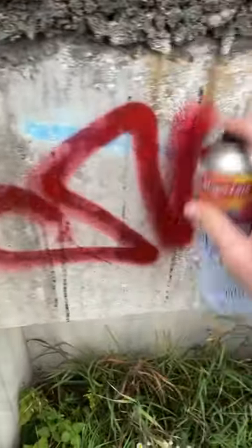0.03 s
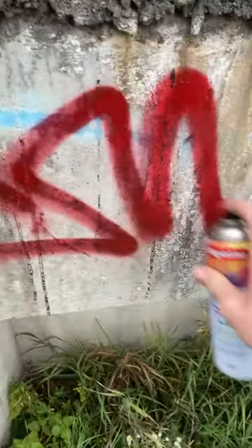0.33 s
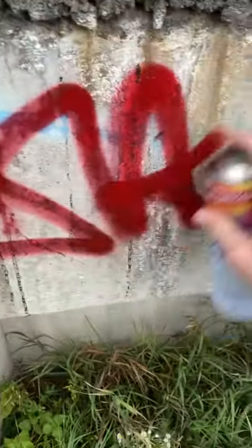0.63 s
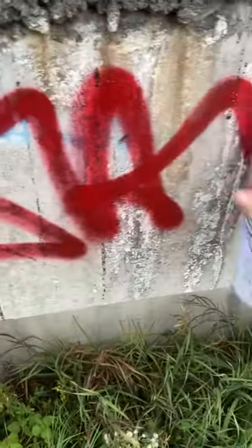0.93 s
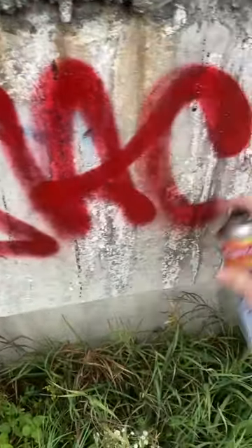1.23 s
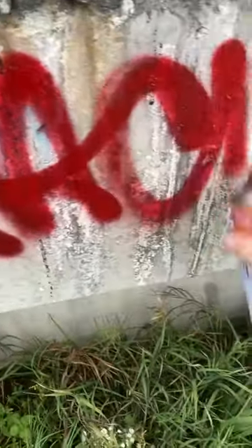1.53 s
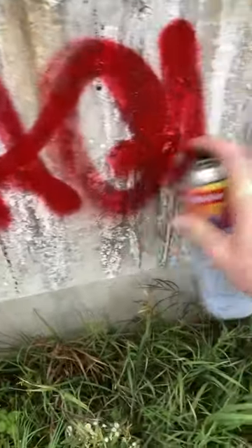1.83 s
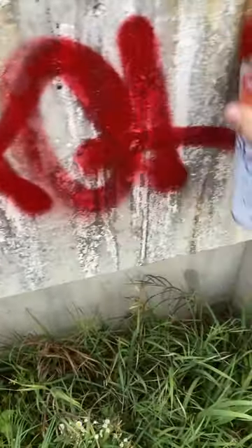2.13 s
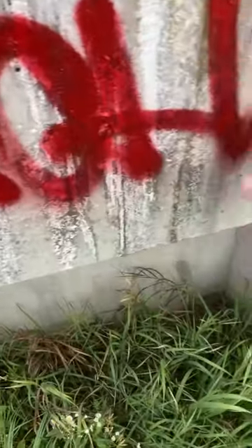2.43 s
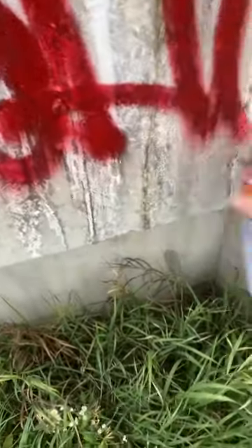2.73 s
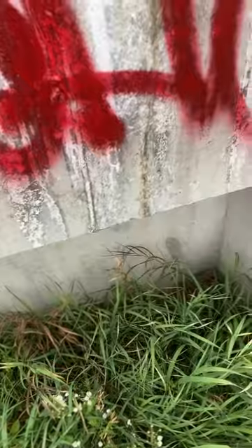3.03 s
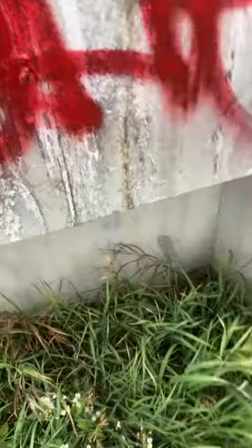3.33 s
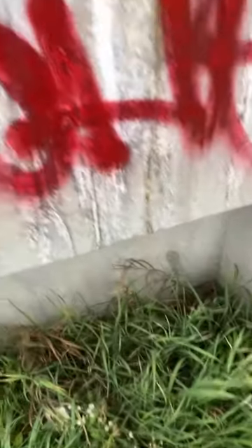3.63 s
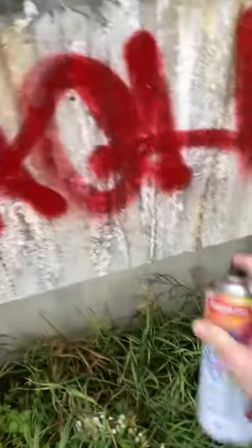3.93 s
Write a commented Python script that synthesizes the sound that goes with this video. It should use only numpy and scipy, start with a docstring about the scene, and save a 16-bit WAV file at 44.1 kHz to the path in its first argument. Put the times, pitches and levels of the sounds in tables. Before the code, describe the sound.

A spray paint can hisses close by outdoors, thin and high, from the start, turning fuller from about 1.3 to 2.2 seconds. The mixing ball clicks and rattles irregularly inside, clacking hardest between 1.4 and 1.8 seconds. Low puffs of wind touch the microphone near 2.1 and 2.9 seconds. The hiss cuts off at 3.4 seconds, and the ball rattles on softly over a faint background.

```python
"""A can of spray paint hisses at a concrete wall outdoors, an arm's length from two small microphones.
The hiss is heard mostly above 8 kHz; its lower band comes through in a few stretches.
The mixing ball strikes the can as the hand swings, and rattles on softly after the valve shuts.
Puffs of air buffet the microphones over a faint outdoor background."""
import sys
import numpy as np
from scipy import signal
from scipy.fft import rfft, irfft
from scipy.io import wavfile
from scipy.ndimage import uniform_filter1d

SR = 44100
rng = np.random.default_rng(int(sys.argv[2]) if len(sys.argv) > 2 else 0)


def dump_mix(stems):
    """Bounce the given channels to the path in sys.argv[1] as a 16-bit WAV at rate SR."""
    frames = np.atleast_2d(stems).T  # one column per channel
    limited = np.clip(frames, -1, 1)  # hard clip at full scale
    pcm = np.round(limited * 32767).astype(np.int16)
    wavfile.write(sys.argv[1], SR, pcm)


N = 176400


def gain_of(db):
    """Decibels to amplitude."""
    return 10 ** (np.asarray(db) / 20)


def unit_rms(x):
    """Scales to rms 1."""
    return x / np.sqrt(np.mean(x ** 2) + 1e-20)


def at_hz(table, hz):
    """Interpolates a spectrum table over log frequency."""
    table_hz, values = np.transpose(table)
    return np.interp(np.log(hz + 1), np.log(table_hz + 1), values)


def add_at(mix, start_s, sound):
    """Mixes in a two-channel sound."""
    part = mix[:, max(round(start_s * SR), 0):][:, :sound.shape[1]]
    part += sound[:, :part.shape[1]]


def coloured(x, colour):
    """Minimum-phase filter from a table of Hz and dB."""
    size = x.shape[-1]
    log_gain = np.log(gain_of(at_hz(colour, abs(np.fft.fftfreq(size, 1 / SR)))))
    response = np.exp(signal.hilbert(log_gain).conj()[:size // 2 + 1])
    return irfft(rfft(x) * response, size)


def noise(colour, size=N):
    """Two-channel coloured noise at rms 1."""
    return unit_rms(coloured(rng.standard_normal((2, size)), colour))


def stft_grid(size=256):
    """Frame times in seconds (column) and bin frequencies in Hz (row)."""
    frame_s = np.arange(N * 4 // size + 5) * (size // 4) / SR
    return frame_s[:, None], np.fft.rfftfreq(size, 1 / SR)


def turbulence(field_db, patch_db, flicker_db, size=256):
    """Two-channel noise under a time-frequency level, with drifting patches and quick flicker."""
    patches = uniform_filter1d(rng.standard_normal(field_db.shape), size=18, axis=0)
    patches = unit_rms(uniform_filter1d(patches, size=8, axis=1))
    flicker = unit_rms(uniform_filter1d(rng.standard_normal((len(field_db), 1)), size=5, axis=0))
    real, imag = rng.standard_normal((2, 2) + field_db.shape)
    bins = (real + 1j * imag) * gain_of(field_db + patch_db * patches + flicker_db * flicker)
    return signal.istft(bins.transpose(0, 2, 1), nperseg=size, noverlap=size - size // 4)[1][:, :N]


def valve(shut_s=3.408, fall_db_per_s=607):
    """Nozzle flow: steady until the valve shuts."""
    return gain_of(-fall_db_per_s * np.maximum(np.arange(N) / SR - shut_s, 0))


# Each row: time in seconds, level at lower_hz in dB, level at upper_hz in dB.
JET_LEVELS = [(0.0, -39.5, -31.5), (0.51, -33.5, -36.5), (0.68, -38, -31.5), (0.82, -33, -39.5),
              (0.99, -38.5, -33), (1.08, -36.5, -35.5), (1.97, -34.5, -37.5), (2.75, -35.5, -36),
              (2.87, -45.5, -39.5), (3.07, -37, -35.5), (3.21, -40, -30.5), (3.4, -40, -42)]
# Each row: frequency in Hz, relative density in dB.
JET_COLOUR = [(7820, -56.5), (8020, 3.5), (9500, 0), (11000, 3), (13500, 0.5), (15700, -2)]


def paint_jet(lower_hz=8900, upper_hz=12000):
    """The nozzle's turbulent hiss as heard above 8 kHz; its colour tilts as the can turns."""
    t, hz = stft_grid()
    times_s, lower_db, upper_db = np.transpose(JET_LEVELS)
    lower_db, upper_db = np.interp(t, times_s, lower_db), np.interp(t, times_s, upper_db)
    level = np.hypot(gain_of(lower_db), gain_of(upper_db))
    upper_share = np.clip((hz - lower_hz) / (upper_hz - lower_hz), 0, 1)
    tilt_db = lower_db * (1 - upper_share) + upper_db * upper_share - 20 * np.log10(level)
    hiss = unit_rms(coloured(turbulence(tilt_db, patch_db=3.0, flicker_db=-0.76), JET_COLOUR))
    return hiss * np.interp(np.arange(N) / SR, t[:, 0], level[:, 0]) * valve()


# Each row: start in seconds, end in seconds, level in dB.
LOW_BAND_STRETCHES = [(1.332, 1.542, -37.5), (1.616, 2.15, -38.5), (2.834, 2.882, -36.5)]
# Each row: frequency in Hz, relative density in dB.
LOW_BAND_COLOUR = [(200, 8), (700, -1.5), (1900, 2.5), (2700, -7), (4100, -14.5), (6000, -18), (7800, -3.5),
                   (8400, -52)]


def hiss_low_band(faint_db=-61, treble_boost_db=16.5, shelf_hz=3300, edge_s=0.006):
    """The hiss below 8 kHz: mostly faint, it comes through louder and brighter in a few stretches."""
    t, hz = stft_grid(size=512)
    level, openness = gain_of(faint_db), 0
    for start_s, end_s, db in LOW_BAND_STRETCHES:
        gate = (np.tanh((t - start_s) / edge_s) - np.tanh((t - end_s) / edge_s)) / 2
        level = level + gate * gain_of(db)
        openness = openness + gate
    shelf = np.clip(np.log2((hz + 1) / shelf_hz), 0, 1)
    field_db = at_hz(LOW_BAND_COLOUR, hz) + treble_boost_db * openness * shelf
    field_db -= 10 * np.log10((gain_of(field_db) ** 2).sum(1, keepdims=True))  # equal power per frame
    hiss = unit_rms(turbulence(field_db, patch_db=4.0, flicker_db=2.0, size=512))
    return hiss * np.interp(np.arange(N) / SR, t[:, 0], level[:, 0]) * valve()


# Each row: frequency in Hz, relative density in dB.
BACKGROUND_COLOUR = [(150, 6.5), (400, 1.5), (1500, -1), (7600, -41), (8100, 4), (15700, -1.5)]


def background(level_db=-63):
    """Faint, steady outdoor noise."""
    return gain_of(level_db) * noise(BACKGROUND_COLOUR)


# Each row: centre in seconds, half width in seconds, level in dB.
PUFFS = [(0.171, 0.049, -52.5), (0.47, 0.086, -49), (0.7, 0.032, -51), (1.47, 0.059, -47),
         (1.84, 0.15, -50.5), (2.062, 0.065, -34.5), (2.851, 0.056, -34.5), (3.11, .035, -44.5),
         (3.211, 0.021, -44), (3.64, 0.064, -46.5)]
# Each row: frequency in Hz, relative density in dB.
WIND_COLOUR = [(20, -27), (55, 4.5), (190, -11.5), (350, -23.5), (2000, -78)]


def wind(calm_db=-64.5):
    """Puffs of air buffet the microphones with a low rumble."""
    t = np.arange(N) / SR
    rumble = noise(WIND_COLOUR)
    steady = rumble / np.sqrt(uniform_filter1d(rumble ** 2, size=3200, axis=1))
    puffs = sum(gain_of(db) * np.exp(-((t - centre_s) / width_s) ** 2) for centre_s, width_s, db in PUFFS)
    return steady * (gain_of(calm_db) + puffs)


# Each row: start in seconds, level in dB.
BURSTS = [(0.267, -35), (0.847, -35.5), (0.5515, -46), (1.382, -22.5), (1.608, -22.5), (1.653, -23.5),
          (2.073, -30)]
# Each row: frequency in Hz, relative density in dB.
BURST_COLOUR = [(1500, -28), (3800, 7), (12000, 6)]


def spits_and_clacks(swell_s=0.0021, size=2048):
    """Short broadband bursts: spits of paint and the ball's hardest clacks."""
    out = np.zeros((2, N))
    age = np.arange(size) / SR / swell_s
    envelope = age * np.exp(1 - age)
    for start_s, db in BURSTS:
        add_at(out, start_s, gain_of(db) * noise(BURST_COLOUR, size) * envelope)
    return out


# Each row: frequency in Hz, relative level in dB, T60 in seconds.
CAN_MODES = [(747, -8.5, 0.0079), (1123, 0, 0.02), (1446, -2, 0.015), (1828, 5, 0.025)]
# Each row of both: frequency in Hz, relative density in dB.
TICK_COLOUR = [(3000, -29), (7850, -26), (8050, -3), (9900, 2), (13000, -6), (15600, -4.5)]
CRACK_COLOUR = [(100, -4.5), (1800, 4.5), (3600, -1.5), (7500, -21)]


def ball_strike(tick_db, ring_db, size=3072):
    """Ball hits can: a bright tick, a broad crack and the wall's damped modes, low ones last."""
    contact_s, tail_db, tail_t60_s = 0.0005, -11.5, 0.021
    crack_db, crack_t60_s = -3.5, 0.093
    pitch_spread, lag_at_1khz_s = 0.079, 0.001964

    def unit_energy(x):
        """Scales each channel to the energy of 1 ms at rms 1."""
        return x * np.sqrt(0.001 * SR / (x ** 2).sum(1, keepdims=True))

    t = np.arange(size) / SR
    attack = np.minimum(t / contact_s, 1)
    tick_noise, crack_noise = rng.standard_normal((2, 2, size))
    dwell_s = contact_s * rng.uniform(1, 1.03)
    snap = np.exp(-(t / dwell_s) ** 2 / 2)
    tail = gain_of(tail_db - 60 * t / tail_t60_s)
    tick = coloured(tick_noise * attack * (snap + tail), TICK_COLOUR)
    crack = coloured(crack_noise, CRACK_COLOUR) * attack * gain_of(-60 * t / crack_t60_s)
    modes = np.zeros((2, size))
    pitch = np.exp(pitch_spread * rng.uniform(-0.79, 1))  # varies with the spot struck
    for hz, db, t60_s in CAN_MODES:
        age_s = np.maximum(t - lag_at_1khz_s * 1e3 / hz, 0)  # low bending waves arrive later
        strength, detune, phase = rng.standard_normal((3, 2, 1))
        mode_hz = hz * pitch * (1 + 0.047 * detune[0])
        envelope = gain_of(db + 2 * strength - 60 * age_s / t60_s) * np.minimum(age_s * hz, 1)
        modes += envelope * np.sin(2 * np.pi * (mode_hz * age_s + phase))
    ring = unit_energy(modes) + gain_of(crack_db) * unit_energy(crack)
    return gain_of(tick_db) * unit_energy(tick) + gain_of(ring_db) * ring


# Each row: start in seconds, tick in dB, ring in dB.
STRIKES = [(0.268, -7, -36), (0.2886, -9.5, -33.5), (0.3407, -21.5, -36.5), (0.4373, -15.5, -41.5),
           (0.4648, -22, -42.5), (0.5837, -30, -40), (0.706, -29, -42), (0.8485, -11.5, -36),
           (0.8823, -18.5, -38), (1.1137, -40, -40), (1.1623, -14.5, -40), (1.206, -13.5, -34),
           (1.286, -16, -32.5), (1.3832, -22, -22), (1.6022, -14.5, -28.5), (1.6076, -16.5, -26.5),
           (1.7141, -24.5, -26.5), (1.7362, -27, -19), (1.759, -33, -21), (2.3512, -14, -36),
           (2.3666, -8, -35), (2.6769, -21, -39), (2.8261, -12.5, -36), (2.832, -8, -40),
           (2.848, -23, -22.5), (2.8899, -20.5, -34), (3.168, -45, -46.5), (3.1852, -35, -43),
           (3.275, -18, -29.5), (3.3006, -14.5, -39.5), (3.32, -17, -31.5), (3.415, -25.5, -39),
           (3.4604, -29.5, -48), (3.4804, -23.5, -45.5), (3.5329, -38, -61), (3.6244, -23, -46),
           (3.6943, -26, -55), (3.714, -35, -45), (3.935, -36, -56)]
# Each row: start in seconds, end in seconds, base tick in dB, base ring in dB.
RATTLE_BOUTS = [(1.096, 1.32, -30, -45), (1.38, 2.14, -44, -38.5), (2.38, 2.6, -34, -51),
                (3.279, 3.5, -47, -54.5), (3.52, 3.8, -44, -59)]


def mixing_ball(rattles_per_s=42, spread_db=2.5):
    """The loose ball hits the can in clear strikes and bouts of small random rattles."""
    out = np.zeros((2, N))
    for start_s, tick_db, ring_db in STRIKES:
        add_at(out, start_s, ball_strike(tick_db, ring_db))
    for start_s, end_s, tick_db, ring_db in RATTLE_BOUTS:
        for slot_s in np.arange(start_s, end_s, 1 / rattles_per_s):
            tick_extra_db, ring_extra_db = spread_db * np.minimum(rng.exponential(size=2), 2)
            hit_s = slot_s + rng.random() / rattles_per_s
            add_at(out, hit_s, ball_strike(tick_db + tick_extra_db, ring_db + ring_extra_db))
    return out


# Each row: frequency in Hz, left lead in radians.
MIC_PHASE = [(1000, 0), (1450, 1.5), (1950, -0.6), (2250, -3), (4200, -3.7), (6000, -2.95), (8000, -0.3),
             (9100, 0), (11200, 3), (12300, 3.4), (14400, 6.1)]
# Each row: frequency in Hz, left-right coherence as a ratio.
MIC_COHERENCE = [(800, 1), (1300, .72), (4000, .78), (7500, .8), (8100, .97), (12000, .94)]
# Each row: frequency in Hz, left minus right in dB.
MIC_BALANCE = [(700, 0), (2000, -3), (2800, 0)]


def microphone_pair(mid_side):
    """Mid and side to left and right, with the pair's coherence, phase and balance."""
    hz = np.fft.rfftfreq(2 * N, 1 / SR)
    coherence = np.clip(at_hz(MIC_COHERENCE, hz), -1, 1)
    mid, side = rfft(mid_side, 2 * N) * np.sqrt([(1 + coherence) / 2, (1 - coherence) / 2])
    skew = np.exp(0.5j * at_hz(MIC_PHASE, hz)) * np.sqrt(gain_of(at_hz(MIC_BALANCE, hz)))
    return irfft(np.array([(mid + side) * skew, (mid - side) / skew]))[:, :N]


def scene():
    """Spray can, background and wind at the microphones."""
    mix = background() + paint_jet() + hiss_low_band() + spits_and_clacks() + mixing_ball() + wind()
    return microphone_pair(mix)


def record(dry, cutoff_hz=15900):
    """Steep low-pass on the top treble."""
    lowpass = signal.firwin(511, cutoff_hz, window=("kaiser", 9), fs=SR)
    return signal.oaconvolve(dry, lowpass[None], "same")


dry = scene()
out = record(dry)
dump_mix(out)
```